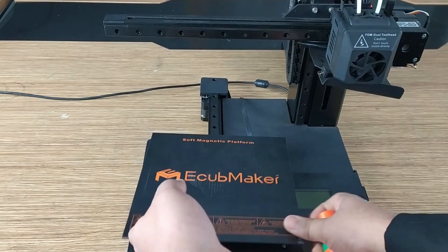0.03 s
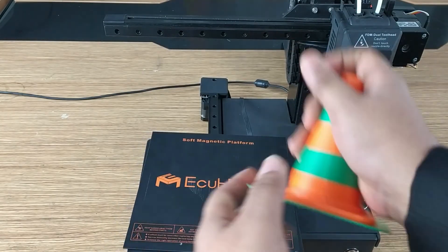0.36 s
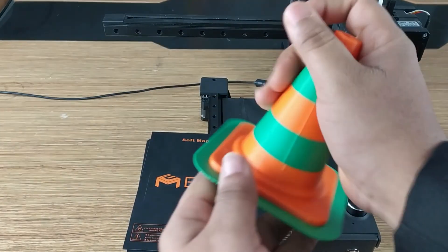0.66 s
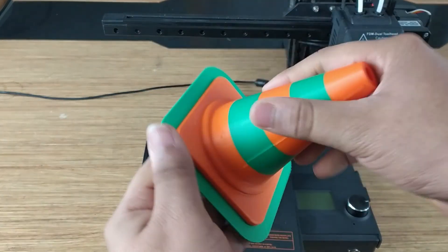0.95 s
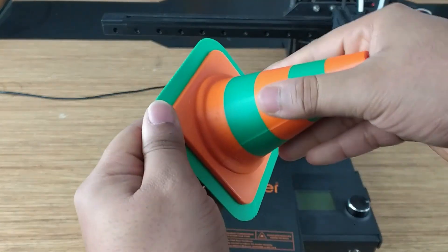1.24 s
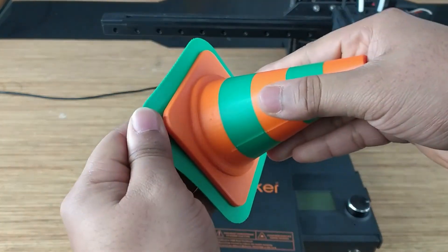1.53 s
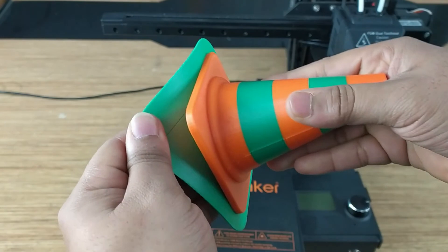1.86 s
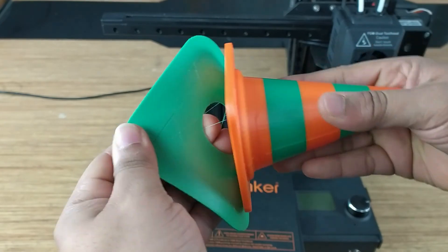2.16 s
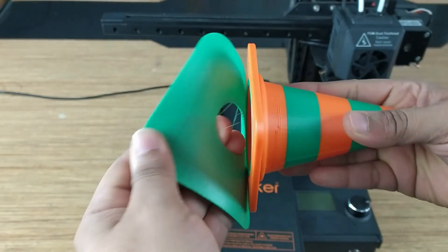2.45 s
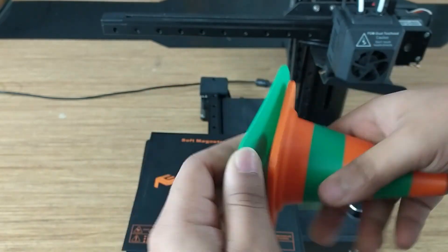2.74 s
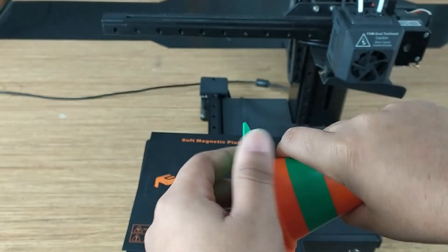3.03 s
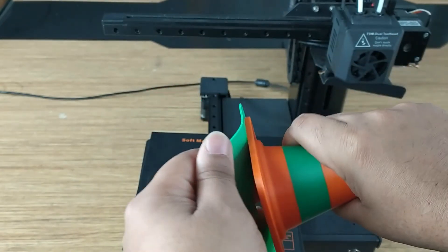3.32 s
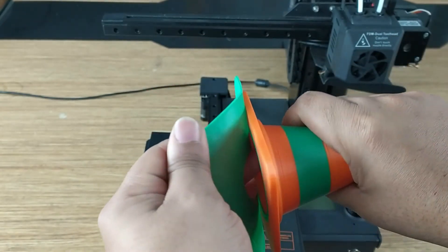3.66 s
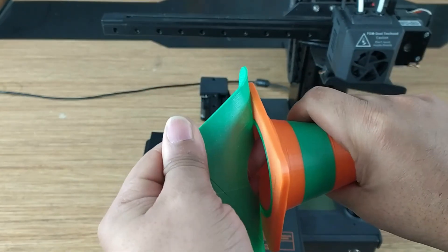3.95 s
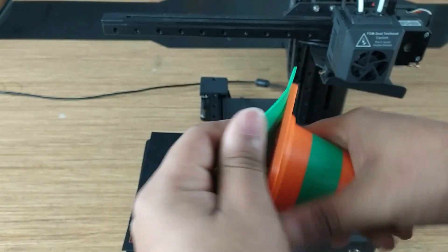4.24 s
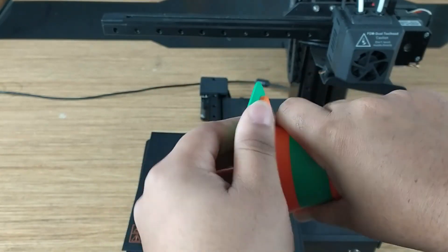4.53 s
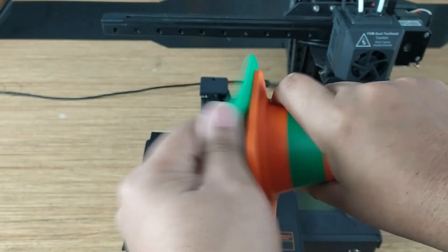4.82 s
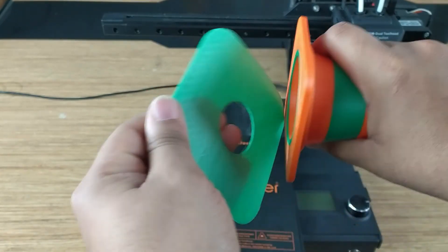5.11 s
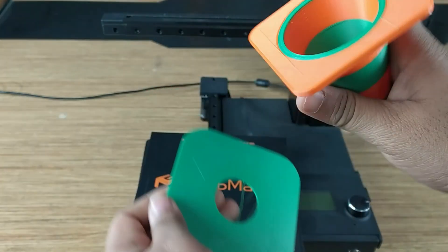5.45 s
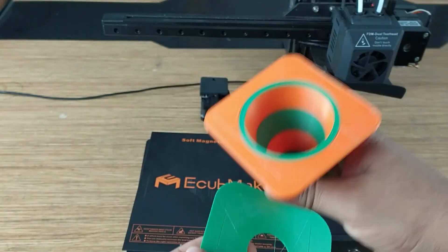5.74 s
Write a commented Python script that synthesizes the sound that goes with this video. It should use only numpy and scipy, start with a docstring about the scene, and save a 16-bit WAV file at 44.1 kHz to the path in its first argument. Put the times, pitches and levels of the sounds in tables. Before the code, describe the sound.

Sharp, bright cracks come in three bursts as thin plastic is pulled away from a plastic cone. The freed sheet flaps briefly, and the loudest snaps ring around the bare room and slightly overload the close microphone. Between the bursts, fingers slide over the plastic with a grainy hiss and dragged edges make the cone ring faintly. A faint low hum lingers after the final rip.

```python
"""A thin printed plastic sheet is peeled off the base of a hollow printed cone, close by, in a bare room.
The bond gives way in single snaps and a few short rips: bursts of tiny breaks that shake the sheet and
echo round the room. Large freed patches flap, and the loudest cracks overload the microphone.
In between, fingers rub and shift on the plastic, and dragged edges make the cone ring.
An earlier noise is still dying away at first, and a faint hum stands in the room near the end."""
import sys
import numpy as np
from scipy import signal
from scipy.fft import rfft, irfft, next_fast_len
from scipy.io import wavfile
from scipy.ndimage import uniform_filter1d

SR = 44100
rng = np.random.default_rng(int(sys.argv[2]) if len(sys.argv) > 2 else 0)


def log_audio(samples):
    """Write samples as a 16-bit WAV file to the path given in sys.argv[1]."""
    # one column per channel
    frames = np.atleast_2d(samples).T
    # limit to full scale, then quantise
    limited = np.clip(frames, -1, 1)
    pcm = np.round(limited * 32767).astype(np.int16)
    wavfile.write(sys.argv[1], SR, pcm)


N = 263718
TIME = np.arange(N) / SR

# A "colour" says how strong a sound is at each frequency.
# colour of the still air in the room: (frequency [Hz], level [dB])
AIR_COLOUR = [(15, -40), (25, 0.5), (127, -13), (175, -4.5), (223, -7), (591, -16), (1040, -15),
              (2840, -24.5), (3250, -26.5), (4140, -27.5), (11300, -55), (13200, -34), (16000, -43.5)]
# colour of the earlier noise left in the room: (frequency [Hz], level [dB])
OLD_ECHO_COLOUR = [(24, -54), (40, -29), (96, -12), (127, -25), (167, -8), (329, -4), (615, -17.5),
                   (1120, -10), (1750, -21), (2800, -12), (3200, -23), (4300, -13), (4800, -23),
                   (6400, -13), (7700, -17.5), (8800, -8.5), (14800, -42), (16000, -84)]
# how alike left and right are in the background and rubbing: (frequency [Hz], likeness [0 to 1])
NOISE_LIKENESS = [(40, 0.8), (300, 0.93), (700, 0.13), (2000, 0.04), (6000, 0.12), (8000, 0.22),
                  (12000, 0.45)]
# how long the room's echo takes to fade by 60 dB: (frequency [Hz], fade time [s])
ROOM_FADE = [(150, 2), (500, 1.3), (800, 0.93), (1100, 1.04), (1500, 0.91), (3000, 1.05), (6000, 0.72),
             (9000, 0.6), (14000, 0.32)]
# colour of the echo, with the hollow cone's ring near 1.1 kHz: (frequency [Hz], level [dB])
ECHO_COLOUR = [(100, -33.5), (330, -12.5), (620, -12), (950, -3), (1120, 3), (1300, -1.5), (1520, -3.5),
               (2500, 3.5), (3800, 4), (5000, 4.5), (6300, 6.5), (9000, 4), (10300, 9.5), (11200, 4),
               (14000, 8)]
# how alike left and right are in the echo: (frequency [Hz], likeness [0 to 1])
ECHO_LIKENESS = [(1000, 0.1), (4500, 0.055), (6200, 0.22), (7500, 0.79), (14000, 0.72)]
# the hands lift, regrip and turn the cone: (middle time [s], length [s], level [dB])
HAND_MOVES = [(.62, 1, -55.5), (4.35, 1, -60.5), (5.7, 1, -61)]
# dull colour of the moving hands: (frequency [Hz], level [dB])
HAND_COLOUR = [(53, -37), (90, -15.5), (178, 2), (258, -3), (349, -2), (389, -5), (424, -7), (905, -26.5),
               (1090, -29), (1200, -30.5), (1560, -43.5), (2640, -120)]
# fingers slide on the plastic: (middle time [s], length [s], level [dB])
FINGER_RUBS = [(.298, 0.034, -52), (.37, 0.27, -60), (.655, 0.22, -55.5), (.79, 0.3, -48),
               (.93, 0.17, -52.5), (1.1, 0.15, -57), (2.7, 0.65, -47), (2.8, 0.052, -46.5),
               (2.95, 0.1, -53.5), (4.08, 0.34, -44), (4.255, 0.21, -46), (4.38, 0.35, -62.5),
               (5.33, 0.33, -58.5), (5.49, 0.13, -60.5), (5.6, 0.27, -59)]
# colour of that rubbing: (frequency [Hz], level [dB])
RUB_COLOUR = [(530, -44.5), (900, -20), (1080, 1), (1570, -40), (1750, -21), (2540, -7.5), (3340, -13.5),
              (4980, -6.5), (5820, -7.5), (9090, 6), (11300, -9), (14000, -16), (16000, -25)]
# the fingers rub mostly to the right: (frequency [Hz], left minus right [dB])
RUB_BALANCE = [(180, 0), (1650, -2), (5000, -0.5), (8000, -4), (15000, 2)]
# broad brushes of finger, palm and sleeve: (time [s], length [s], level [dB], centre frequency [Hz])
SOFT_BRUSHES = [(0.45, 0.29, -59, 60.5), (0.755, 0.1, -60, 1850), (2.765, 0.088, -59.5, 2880),
                (4.02, 0.12, -56.5, 303), (5.58, 0.1, -53.5, 223), (5.68, .1, -55.5, 361),
                (5.69, 0.27, -59.5, 567), (5.7, 0.24, -66.5, 840)]
# dragged edges make the hollow cone ring: (time [s], length [s], level [dB], pitch [Hz])
EDGE_SCRAPES = [(2.774, 0.057, -46.5, 1133), (2.782, 0.055, -53, 1630), (2.83, 0.21, -61, 1110),
                (3.14, 0.3, -63, 1090), (4.18, 0.12, -60.5, 1060)]
# a large patch comes free and flaps: (time [s], pitch [Hz], level [dB], time to fade by 60 dB [s])
PATCH_FLAPS = [(1.497, 990, -20, 0.066), (1.494, 2700, -19, 0.035), (1.968, 2650, -16, 0.042),
               (1.5, 160, -29, 0.078), (1.6, 75, -33, 0.052), (1.59, 78, -30.5, 0.05),
               (1.975, 274, -11.5, 0.058), (1.997, 736, -8.5, 0.028), (2.005, 350, -15, 0.039),
               (2.008, 70, -23, 0.06), (2.006, 154, -23.5, 0.068), (3.41, 355, -17, 0.028),
               (3.413, 210, -19, 0.02), (3.55, 85, -25.5, 0.034), (4.72, 190, -16.5, 0.071),
               (4.738, 450, -16.5, 0.028), (4.737, 2300, -16, 0.015), (4.752, 1080, -18, 0.06)]
# colour of a break in the bond: (frequency [Hz], level [dB])
SHEET_COLOUR = [(47, -20), (70, -5.5), (115, -9.5), (296, -2), (877, -6), (1070, -0.5), (1220, -7),
                (2430, -3), (3170, -7.5), (4520, -5.5), (4940, -7.5), (9190, 0.5), (11200, -7.5),
                (15000, -17.5), (16000, -23)]
# the sheet is pulled tight and crackles: (start [s], end [s])
PULL_TIMES = [(1.5, 2), (3.42, 3.76)]
# The more sheet lets go at once, the more "body" (middle and bass) a break has.
# the bond unzips in a run of tiny breaks: (time [s], length [ms], treble level [dB], body [dB])
BOND_RIPS = [(1.279, 7.8, -18, -9), (1.497, 19.2, -12.5, -9), (1.972, 24.7, -11.5, -7),
             (1.995, 21.2, -16.5, -6), (4.724, 14, -17.5, -7), (4.738, 19.7, -14.5, -1.5)]
# the bond gives way at one spot:
# (time [s], length [ms], treble level [dB], body [dB], crack pitch [Hz], left minus right [dB])
BOND_SNAPS = [(0.4866, 1.4, -36, -18, 9200, -2), (0.9033, 4.2, -38.5, -8.5, 8000, -4),
              (1.2742, 4.8, -10, -9, 8500, -1.5), (1.2898, 1.7, -20.5, -8, 9000, -4),
              (1.2975, 3.3, -16.5, -10.5, 8900, 2), (1.307, 3.8, -14.5, -9.5, 8600, 6.5),
              (1.492, 4.6, -11, -3, 8100, 1), (1.641, 2.1, -21, -7, 9400, 2),
              (1.6524, 1.2, -13, -8.5, 9500, -2), (1.6571, 2.5, -21.5, -6, 8800, -7),
              (1.6635, 9.7, -8, -7.5, 9000, 0.5), (1.761, 1.7, -26, -24, 8800, -2),
              (1.7702, 1.52, -21.5, -30, 8900, -1), (1.8326, 1.3, -14.5, -25, 8700, -12),
              (1.8505, 2.4, -30, -21.5, 9000, -3.5), (1.861, 1.5, -34.5, -17.5, 8700, -4),
              (1.8677, 1.7, -26, -13, 8500, -7), (1.871, 7.3, -8, -8, 8500, 2),
              (1.883, 2.8, -15, -9.5, 8900, -8.5), (1.887, 5.8, -14.5, -4.5, 8300, -8),
              (1.913, 2.1, -12.5, -9, 8400, -3), (1.9345, 2.5, -12.5, -6.5, 8500, -1.5),
              (1.9667, 5.8, -10.5, -3, 8800, 4), (2.17, 1.7, -10.5, -13, 8800, -7),
              (2.2832, 2.1, -9.5, -13.5, 8700, -1), (2.982, 7, -37.5, -5, 8700, -6),
              (3.0247, 4.2, -20.5, -16, 8700, -6), (3.174, 4, -22.5, -14, 9400, -5),
              (3.2243, 0.9, -30, -19, 9300, -8), (3.249, 1.7, -33, -20, 8700, -4.5),
              (3.2628, 4.7, -10.5, -18, 9300, -3.5), (3.3974, 2.7, -5, -16, 8800, 5),
              (3.4085, 7.8, -6, -8.5, 9000, -0.5), (3.4525, 2.1, -7.5, -14, 8500, 5),
              (3.5965, 3.8, -12.5, -12.5, 8600, -4), (3.6064, 5.4, -12, -9, 8500, 7.5),
              (3.623, 1.7, -19, -8, 9000, -7), (3.687, 0.91, -24, -22.5, 8600, 1),
              (3.7324, 0.84, -31, -20, 9200, -1), (3.7664, 0.76, -17, -16.5, 8000, -11.5),
              (3.9022, 1.4, -19, -20, 8350, -6), (4.5152, 2.1, -22.5, -18, 9000, -10),
              (4.6922, 2.4, -13.5, -11, 8000, -4), (4.698, 0.31, -14, -17.5, 8300, 9.5),
              (4.714, 3.2, -13.5, -6, 7600, -2), (4.7218, 5.5, -13.5, -8, 8000, -1),
              (4.7262, 2.2, -15.5, -15, 8000, -0.5), (4.7302, 4.3, -7.5, -9.5, 7900, 1)]

FLAT = ((20, 0), (20000, 0))  # no change at any frequency: (frequency [Hz], level [dB])
CRACK_HZ, CRACK_WIDTH_HZ, CRACK_DB = 9250, 1680, 6  # free edge's broad ring: usual pitch, width, boost


def amp(db):
    """Turns decibels into a number to multiply by."""
    return 10 ** (np.asarray(db) / 20)


def evened(x):
    """Scales a signal to an average power of 1."""
    return x / np.sqrt(np.mean(x ** 2) + 1e-20)


def read(points, hz):
    """Looks up a table between its rows, on a log-frequency scale."""
    row_hz, value = np.transpose(points)
    return np.interp(np.log(hz + 1), np.log(row_hz + 1), value)


def add(mix, s, sound):
    """Mixes a sound in at s seconds."""
    part = mix[:, max(round(s * SR), 0):][:, :sound.shape[1]]
    part += sound[:, :part.shape[1]]


def pair(likeness, two):
    """Turns two unrelated signals into a partly alike left and right."""
    shared = np.clip(likeness, 0, 1)
    return np.array([two[0], shared * two[0] + np.sqrt(1 - shared ** 2) * two[1]])


def panned(db):
    """Left and right gains that make the left db decibels louder."""
    return amp(np.array([[.5], [-.5]]) * db)


def noise(colour, balance=FLAT):
    """Stereo noise of a given colour, nearly the same on both sides in the bass."""
    size = next_fast_len(N)
    hz = np.fft.rfftfreq(size, 1 / SR)
    white = pair(read(NOISE_LIKENESS, hz), rfft(rng.standard_normal((2, size))))
    spectrum = white * panned(read(balance, hz)) * amp(read(colour, hz))
    return evened(irfft(spectrum, size)[:, :N])


def swells(rows):
    """Loudness over time: each movement rises and falls in one smooth arch."""
    return sum(amp(db) * np.maximum(np.cos(np.pi * np.clip((TIME - s) / length, -1, 1)), 0) ** 2.4
               for s, length, db in rows)


def flattened(force, bins, size=8192):
    """Evens out chance bumps in a burst's colour, over a number of neighbouring frequency bins."""
    spectrum = rfft(force, size)
    power = np.maximum(uniform_filter1d(abs(spectrum) ** 2, size=bins), 1e-12)
    return irfft(spectrum / np.sqrt(power))[:, :size // 2]


def die_away(x, colour=FLAT):
    """Fades each frequency at the room's own rate: the bass lasts longest."""
    hz, t, bands = signal.stft(x, SR, nperseg=512)
    fade_db = read(colour, hz)[:, None] - 60 * t / read(ROOM_FADE, hz)[:, None]
    return signal.istft(bands * amp(fade_db), SR, nperseg=512)[1][:, :x.shape[1]]


def hum(start_s=4.78, end_s=5.74, rise_s=0.076, fall_s=0.028, start_hz=177, start_db=-58.5):
    """A faint, unsteady tone that sinks a little in pitch as it grows louder."""
    waver, flutter = evened(uniform_filter1d(rng.standard_normal((2, N)), size=2000))
    age = TIME - start_s
    fade = np.clip(np.minimum(age / rise_s, (end_s - TIME) / fall_s), 0, 1)
    pitch_hz = start_hz - 2 * age + 6 * waver
    tone = np.sin(2 * np.pi * np.cumsum(pitch_hz) / SR)
    return amp(start_db + 3.5 * age) * fade * evened(amp(3 * flutter) * tone)


def background(air_db=-57, echo_db=-27.5):
    """The fading echo of an earlier noise, the hum and the still air."""
    old_echo = amp(echo_db) * die_away(noise(OLD_ECHO_COLOUR))
    return old_echo + hum() + amp(air_db) * noise(AIR_COLOUR)


def room(x, tail_db=2, early_db=-15, build_s=0.016, early_s=0.0044, bounces_per_s=2000):
    """Sound bounces quickly off desk and hands, then off the walls in a dense, slowly dying tail."""
    t = TIME[:2 * int(.65 * SR)]
    likeness = read(ECHO_LIKENESS, np.fft.rfftfreq(len(t), 1 / SR))
    walls = irfft(pair(likeness, rfft(rng.standard_normal((2, len(t))))))
    tail = die_away(walls, ECHO_COLOUR) * (1 - 0.25 * np.exp(-t / build_s))
    tail *= np.minimum(t / .012, 1)  # the walls take a moment to answer
    bounces = rng.standard_normal((2, len(t))) * (rng.random((2, len(t))) < bounces_per_s / SR)
    early = bounces * np.exp(-t / early_s)
    response = (amp(tail_db) * evened(tail) + amp(early_db) * evened(early)) / np.sqrt(len(t))
    return signal.fftconvolve(x, response, axes=1)[:, :N]


def moving_room(x, turn_hz=1.703):
    """The hands move, so each crack meets its own blend of three echo patterns."""
    angle = np.pi * turn_hz * TIME
    return np.sqrt(2 / 3) * sum(room(x * np.cos(angle + k * np.pi / 3)) for k in range(3))


def hands(rest_db=-64):
    """Hands holding the cone make a dull noise that swells when they move."""
    return (amp(rest_db) + swells(HAND_MOVES)) * noise(HAND_COLOUR)


def rubbing(grain_db=2.0, rest_db=-68):
    """Skin catches on the printed ridges: a grainy hiss."""
    grain = amp(grain_db * evened(uniform_filter1d(rng.standard_normal(N), size=150)))
    hiss = evened(noise(RUB_COLOUR, RUB_BALANCE) * grain)
    return hiss * (amp(rest_db) + swells(FINGER_RUBS))


def strokes(rows, width):
    """Brushes or scrapes: friction noise swells around one pitch; a smaller width rings more clearly."""
    mix = np.zeros((2, N))
    for s, length, db, hz in rows:
        count = int(length * SR)
        friction = pair(0.7, rng.standard_normal((2, count)))
        b, a = signal.iirpeak(hz, 1 / width, fs=SR)
        ring = signal.lfilter(b, a, signal.lfilter(b, a, friction))
        add(mix, s, amp(db) * evened(ring * np.hanning(count)))
    return mix


def flaps(rise_s=0.0031, pan_db=-4):
    """A freed patch of sheet bends to and fro until the fingers quickly still it."""
    mix, t = np.zeros((2, N)), TIME[:SR // 5]
    for s, hz, db, fade_s in PATCH_FLAPS:
        loudness = amp(db - 60 * t / fade_s) * (1 - np.exp(-t / rise_s))
        add(mix, s, panned(pan_db) * loudness * np.sin(2 * np.pi * hz * t))
    return mix


def crackles(per_s=45, length_ms=1, top_db=-30.5, range_db=3, body_db=-13.5):
    """Faint snaps at random moments while the sheet is pulled, as rows like BOND_SNAPS."""
    return [(s, length_ms, top_db - range_db * rng.random(), body_db, CRACK_HZ, 0)
            for start, end in PULL_TIMES for s in rng.uniform(start, end, round(per_s * (end - start)))]


def sheet_response(body_db, crack_hz, size, bend_lag_s=0.00071, fast_hz=6920):
    """How the sheet colours and delays each frequency; with more body, the bass grows fastest."""
    hz = abs(np.fft.fftfreq(size, 1 / SR))
    bass_db, middle_db, upper_db = 8.5 + 1.71 * body_db, 8.5 + body_db, 4.5 + 0.53 * body_db
    body = [(500, bass_db), (1300, middle_db), (3200, middle_db), (5200, upper_db), (7000, 0)]
    edge_db = CRACK_DB / (1 + (2 * (hz - crack_hz) / CRACK_WIDTH_HZ) ** 2)
    gain = amp(np.maximum(read(SHEET_COLOUR, hz) + read(body, hz) + edge_db, -80))
    colour = np.exp(np.conj(signal.hilbert(np.log(gain))))  # nothing sounds before the break
    # low bending waves travel more slowly, so the lows arrive late
    lag_s = bend_lag_s * np.maximum(np.sqrt(fast_hz / np.maximum(hz, 60)) - 1, 0)
    delay = np.exp(-2j * np.pi * np.cumsum(lag_s) * SR / size)
    return (colour * delay)[:size // 2 + 1]


def fracture(force, body_db, crack_hz, pan_db, likeness=0.33, size=8192):
    """A break shakes the sheet. Gives the direct stereo sound and the sound sent into the room."""
    hz = np.fft.rfftfreq(size, 1 / SR)
    heard = flattened(pair(likeness, force), bins=350)
    # the room hears the sheet from all sides and 2 ms later, so only fine ripples stay in its colour
    all_round = flattened(np.pad(force[:1], ((0, 0), (SR // 500, 0))), bins=190)
    spectra = rfft(np.vstack([heard, all_round]), size) * sheet_response(body_db, crack_hz, size)
    treble_energy = (irfft(spectra * (hz > 5000)) ** 2).sum(1, keepdims=True)
    spectra /= np.sqrt(treble_energy)
    balance_db = read([(300, -7), (1100, 0.0016), (6000, pan_db)], hz)  # the thud leans right
    direct = irfft(spectra[:2] * panned(balance_db))
    direct[0] = np.roll(direct[0], 5)  # the left microphone is a little farther away
    return direct, irfft(spectra[2:])


def rip_force(count, breaks_per_s=2800, grain_db=3.5, fade_s=0.00075):
    """The bond unzips for count samples: many small breaks of uneven size, each fading fast."""
    hits = rng.random(count) < breaks_per_s / SR
    sizes = amp(grain_db * np.minimum(rng.exponential(1, count), 3))
    loudness = signal.lfilter([1], [1, -np.exp(-1 / (fade_s * SR))], hits * sizes) + 0.047
    return rng.standard_normal((2, count)) * loudness


def snap_force(length_ms, rise_ms=0.27, slip_ms=1.408, stick_db=-17, fibres_db=-18):
    """A crack sticks and slips for a few milliseconds and stops; a few fibres break after it."""
    ms = np.arange(1000) * 1000 / SR
    rise = 1 - np.exp(-(ms / rise_ms) ** 2)
    crack = np.exp(-(ms / max(length_ms, .3)) ** 2)
    fibres = amp(fibres_db) * np.exp(-ms / 3)
    spacing_ms = slip_ms * (1 + 0.19 * rng.uniform(-0.92, 1))
    jerks = amp(stick_db * np.cos(np.pi * ms / spacing_ms) ** 2)
    return rng.choice([-1, 1], (2, len(ms))) * rise * (crack + fibres) * jerks


def peel(snap_room_db=-3.5, rip_room_db=-1.5, room_per_body=0.38):
    """The bond gives way in snaps and rips; the larger the freed area, the more goes into the room."""
    near, to_room = np.zeros((2, N)), np.zeros((1, N))
    for s, length_ms, db, body_db, crack_hz, pan_db in BOND_SNAPS + crackles():
        direct, sent = fracture(snap_force(length_ms), body_db, crack_hz, pan_db)
        gain = amp(db) * np.sqrt(SR * 0.0028)
        add(near, s, gain * direct)
        add(to_room, s, gain * sent * amp(snap_room_db + room_per_body * body_db))
    for s, length_ms, db, body_db in BOND_RIPS:
        count = int(length_ms * SR / 1000)
        direct, sent = fracture(rip_force(count), body_db, CRACK_HZ, pan_db=0)
        gain = amp(db) * np.sqrt(count)
        add(near, s, gain * direct)
        add(to_room, s, gain * sent * amp(rip_room_db + room_per_body * body_db))
    return near, to_room


def scene():
    """The peeling and handling, with the room around them."""
    peeling, to_room = peel()
    scrapes = strokes(EDGE_SCRAPES, width=0.16)
    brushes = strokes(SOFT_BRUSHES, width=0.53)
    echoes = moving_room(to_room + 0.83 * scrapes)
    return peeling + flaps() + scrapes + brushes + echoes + rubbing() + hands() + background()


def gain_control(x, threshold_db=-22, share=0.38, attack_s=0.015, recover_db_per_s=120):
    """The volume drops just after a loud burst and comes back, lifting the echo."""
    keep = np.exp(-1 / (attack_s * SR))
    power_db = 10 * np.log10(signal.lfilter([1 - keep], [1, -keep], (x ** 2).mean(0)) + 1e-12)
    fall_db = TIME * recover_db_per_s
    held_db = np.maximum.accumulate(power_db + fall_db) - fall_db  # each peak sinks back steadily
    over_db = np.maximum(held_db - threshold_db, 0)
    return x / amp(share * signal.lfilter([1 - keep], [1, -keep], over_db))


def record(dry, overload_from=0.036, push_db=8, ceiling=0.91, top_hz=16100):
    """Big cracks overload the microphone: its rest point shifts and swings back, and peaks are rounded."""
    swing = signal.sosfilt(signal.butter(2, 2600, fs=SR, output="sos"), dry)
    push = np.maximum(abs(swing) - overload_from, 0)
    # smooth the overload into a slow push, then let it return to rest
    for order, hz, kind in (2, 60, "low"), (1, 10, "low"), (2, 1.37, "high"):
        push = signal.sosfilt(signal.butter(order, hz, kind, fs=SR, output="sos"), push)
    shifted = gain_control(dry) - amp(push_db) * panned(-5) * push
    rounded = ceiling * np.tanh(shifted / ceiling)
    treble_cut = signal.firwin(255, top_hz, window=("kaiser", 9), fs=SR)
    return signal.oaconvolve(rounded, treble_cut[None], "same")


dry = scene()
out = record(dry)
log_audio(out)
```